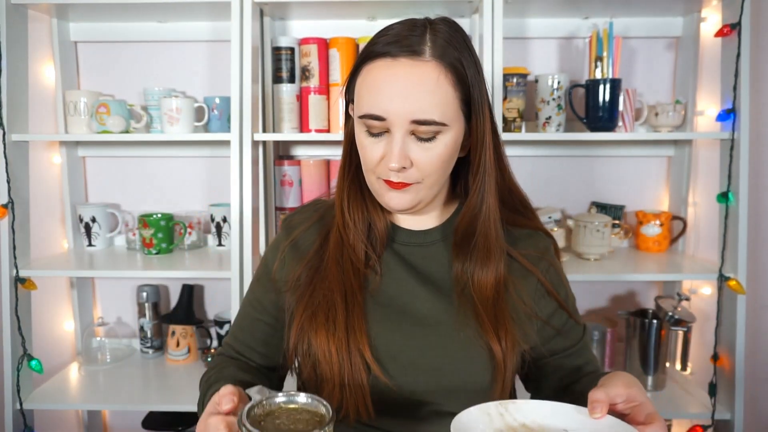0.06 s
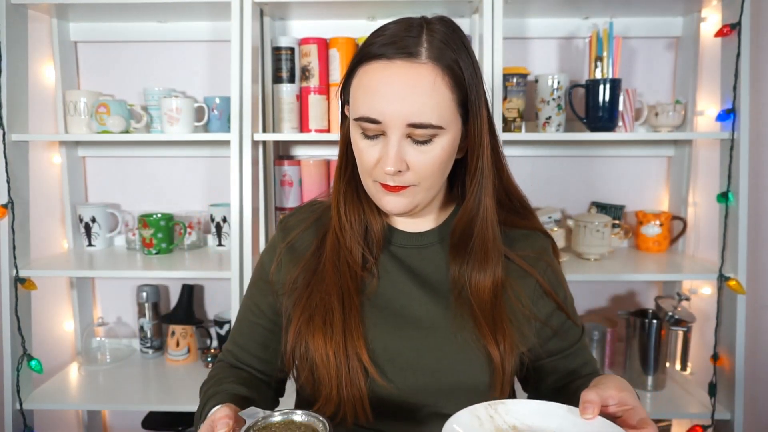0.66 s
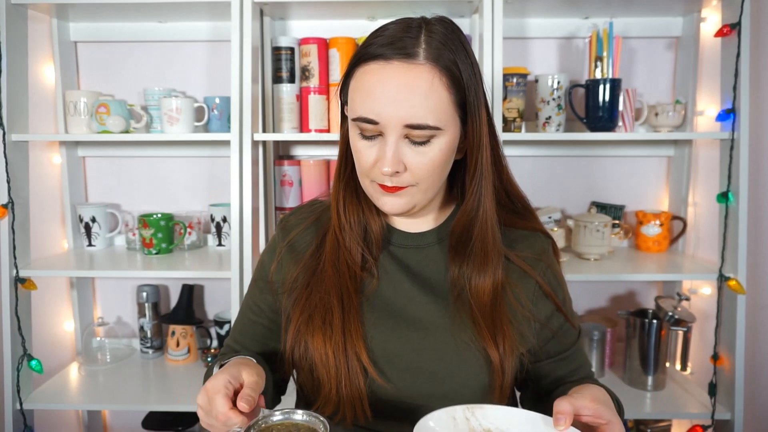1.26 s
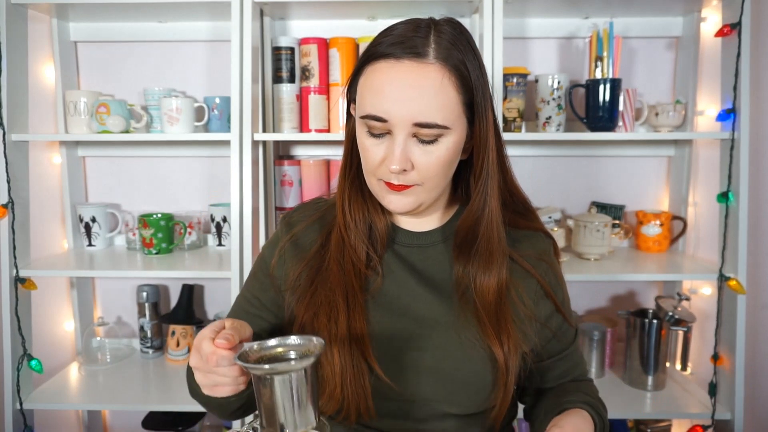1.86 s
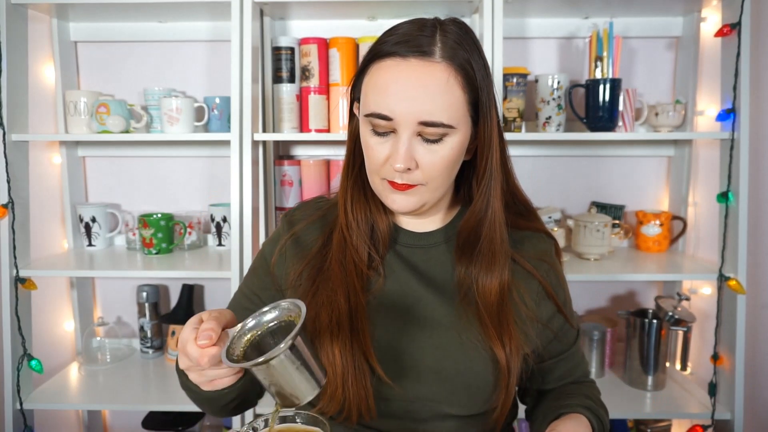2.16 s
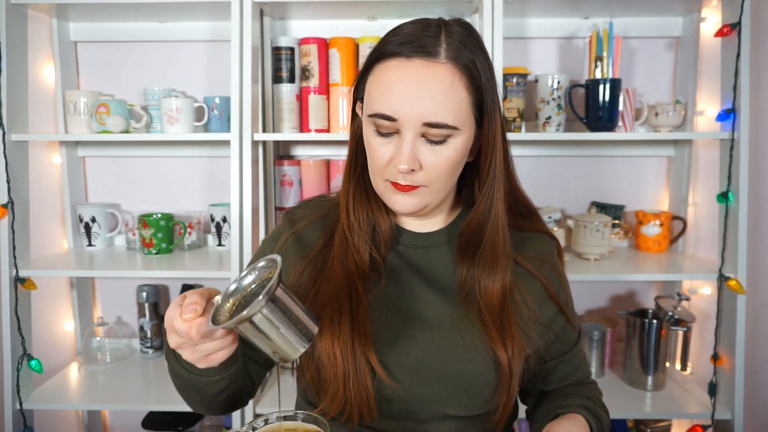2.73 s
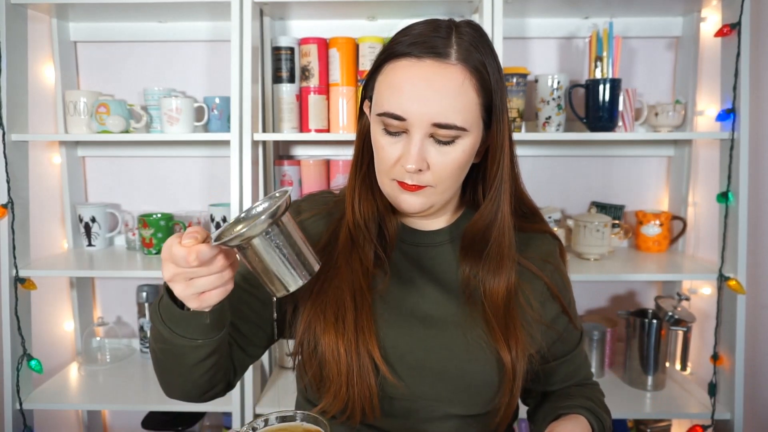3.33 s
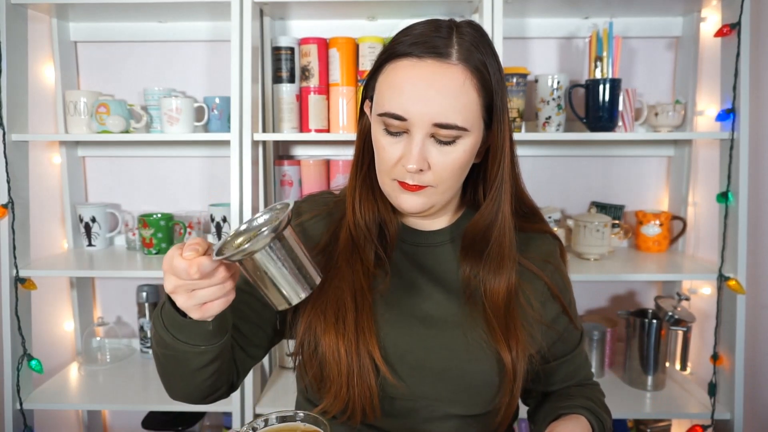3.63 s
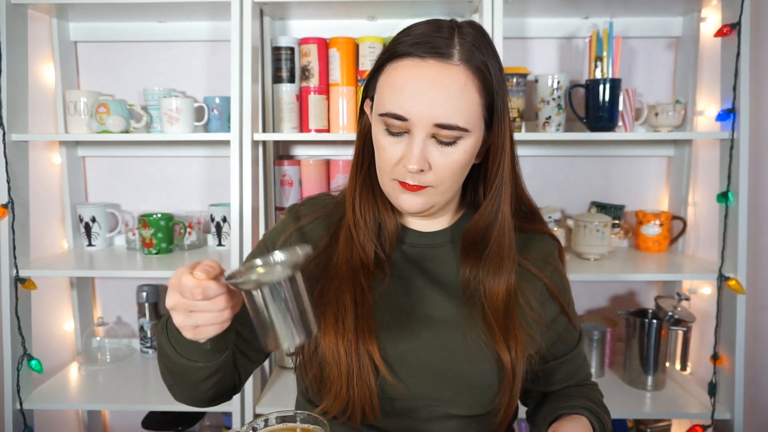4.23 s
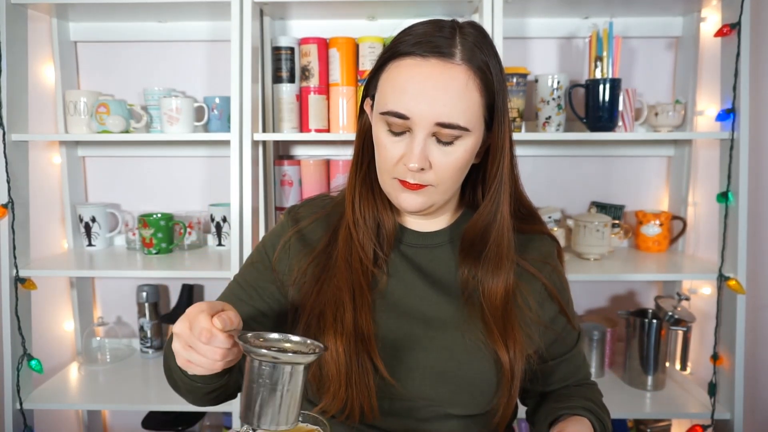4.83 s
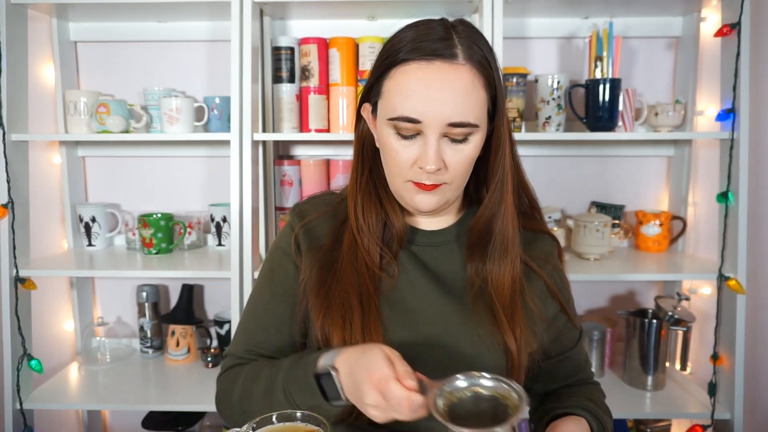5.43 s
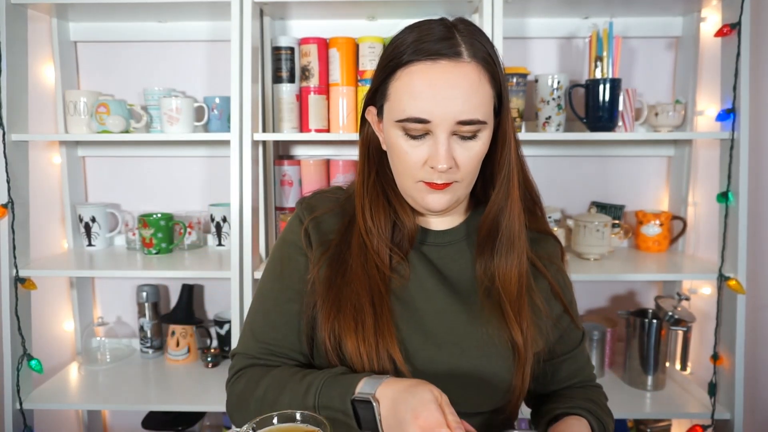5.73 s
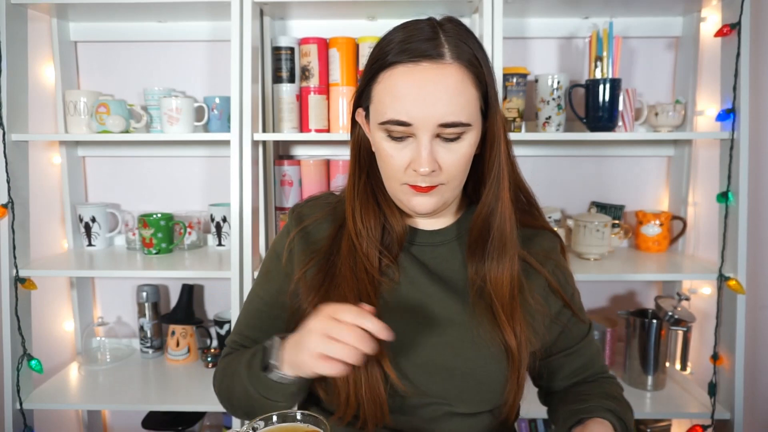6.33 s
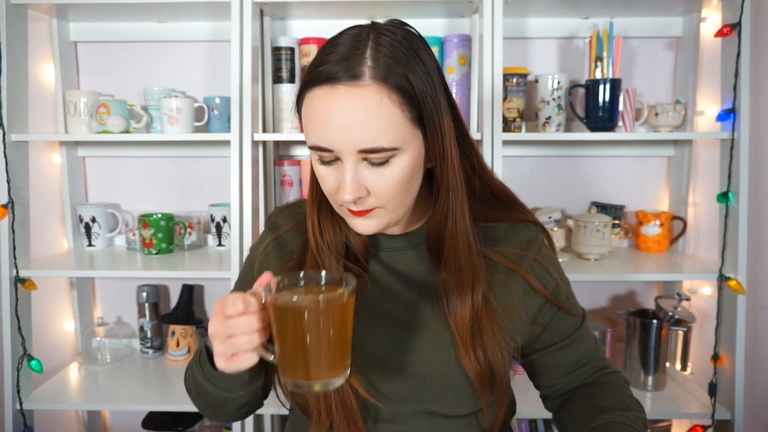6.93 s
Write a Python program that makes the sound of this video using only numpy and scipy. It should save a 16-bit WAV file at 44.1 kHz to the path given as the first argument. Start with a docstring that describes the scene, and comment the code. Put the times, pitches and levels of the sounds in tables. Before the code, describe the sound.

At about 0.4 seconds a glass mug holding a metal infuser lands on a table with a loud, short clack and a low thud. Softer taps and rubs follow until 0.8 seconds, and a small tap with a thin metallic ring comes at 1.4. From about 2.3 seconds the lifted infuser drips into the tea: small, irregular plinks and splashes, thickest around 3 seconds, thinning to single drops that end near 4.3. After a faint rub, the infuser is laid on a plate at about 5.8 seconds with a light cluster of clinks. At 6.5 seconds a hard, bright knock on the table sets off a rattle that stops short a tenth of a second later, leaving a faint dull tail. The sounds are fairly close, in a quiet kitchen with slight reverberation. Soft hiss, a low appliance drone and a barely audible high electrical whine continue throughout.

```python
"""A glass mug holding a metal infuser is put down on a table: the impacts excite the mug's damped
resonances and the modes of the table top, and a quiet kitchen reverberates a little.
The lifted infuser drips into the tea, each drop a splash and a ringing air bubble, and is then laid
on a plate with a light clink. A last hard knock sets off a rattle that stops short.
Soft hiss, a low appliance drone and a thin electrical whine lie under it all."""
import sys
import numpy as np
from scipy import signal
from scipy.fft import rfft, irfft
from scipy.io import wavfile

SR = 44100
rng = np.random.default_rng(int(sys.argv[2]) if len(sys.argv) > 2 else 0)


def wav_record(signal):
    """Record a signal, one row per channel, as 16-bit PCM in the file named by sys.argv[1]."""
    frames = np.transpose(np.atleast_2d(signal))
    bounded = np.clip(frames, -1, 1)
    # unit amplitude maps onto the largest positive 16-bit level
    quanta = np.round(bounded * 32767).astype(np.int16)
    wavfile.write(sys.argv[1], SR, quanta)


N = 307992
T = np.arange(N) / SR

# Levels are relative within each table.
# resonances of the mug with the infuser in it: (frequency [Hz], bandwidth [Hz], level [dB])
MUG_RESONANCES = [(743, 280, -12), (1400, 520, -13), (1990, 350, -0.5), (2495, 190, -0.5),
                  (2956, 280, -2.5), (4060, 200, -8), (5200, 250, -10.5), (6120, 207, -11)]
# contacts of mug and infuser: (time [s], level [dB])
MUG_CONTACTS = [(0.272, -20), (0.3689, 14.5), (0.643, -24), (0.755, -11), (1.3755, -15)]
# modes of the table top: (frequency [Hz], level [dB], t60 [s])
TABLE_MODES = [(87.2, -16, 0.41), (123.7, -7.5, 0.61), (180.8, 2.5, 0.31), (227.4, -5.5, 0.29),
               (272.4, -9.5, 0.31), (330.2, -3.5, 0.264), (392.4, -15, 0.8), (443.6, -5, 0.53),
               (715, -6, 0.44), (801, -7, .4), (930, -11, 0.33), (1132, -6.5, 0.51), (1280, -9.5, 0.5),
               (1460, -17.5, 0.78), (1427, -7.5, 0.66), (1470, -2, 0.67), (1485, -2, 0.9),
               (1740, -13, 0.31), (1950, -0.5, 0.27)]
# blows on the table: (time [s], level [dB], lowest driven [Hz], highest driven [Hz])
TABLE_BLOWS = [(0.3685, -27, 114, 298), (0.428, -32.5, 90, 223), (0.643, -40.5, 90, 308),
               (0.698, -53, 70, 200), (1.376, -55.5, 99, 493), (1.408, -52.5, 100, 398),
               (5.847, -56, 420, 690), (6.5236, -27.5, 350, 2380)]
# onsets of hard contacts: (time [s], level [dB], lowest partial [Hz], loss per partial [dB])
CONTACT_CRACKS = [(0.3695, -10.5, 2133, 15), (0.6432, -39.5, 700, 6), (1.3752, -40.5, 2160, 17),
                  (6.5232, -15, 1260, 6)]
# rattle after the last knock: (frequency [Hz], spectral level [dB])
RATTLE_SPECTRUM = [(100, -35), (230, -7), (430, -8), (600, -14.5), (950, -5.5), (1500, -1.5), (2200, -6),
                   (2600, -17.5), (3400, -17.5), (4600, -33.5), (5500, -27), (7700, -41), (12000, -44),
                   (15000, -53)]
# drops into the tea: (time [s], bubble frequency [Hz], bubble level [dB], glide [octaves/s], splash [dB])
TEA_DROPS = [(2.274, 2900, -48, 1, -65), (2.362, 1990, -42.5, 4, -46.5), (2.5096, 1573, -37.5, -10, -37.5),
             (2.5437, 2550, -33, 11, -33), (2.628, 2090, -43.5, 0, -42), (2.686, 1450, -45.5, -4, -34.5),
             (2.735, 1190, -42, -1, -38.5), (2.798, 2620, -38, 10, -28.5), (2.8465, 1948, -25.5, 12, -36),
             (2.902, 1470, -36, 16.5, -42), (2.9819, 2390, -30, 0.5, -24.5), (3.0364, 1450, -52, 1, -37),
             (3.084, 1900, -37, 28.5, -58), (3.099, 1997, -35, 19, -49), (3.119, 3550, -46, 12, -58),
             (3.14, 1430, -43, -6, -35), (3.176, 3580, -45, 7, -56), (3.183, 1455, -24, 57.5, -24.5),
             (3.387, 2026, -39.5, 8, -57), (3.4519, 1690, -33.5, 3, -38), (3.684, 1430, -47, -8.5, -48),
             (4.0187, 1524, -31.5, -3, -36.5), (4.2863, 1680, -33, -4.5, -39)]
# modes of the plate with the infuser on it: (frequency [Hz], level [dB], t60 [s])
PLATE_MODES = [(1224, -22, 0.12), (1990, 0, 0.13), (3494, 1.5, 0.072), (5840, -10.5, 0.11),
               (7720, -27, .15), (8750, -18.5, 0.2), (10100, -30, 0.16)]
# touches of the infuser on the plate: (time [s], level [dB], highest driven [Hz], pitch [ratio])
PLATE_CONTACTS = [(5.8445, -49.5, 8000, 0.99), (5.848, -44, 9000, 0.97), (5.871, -46, 6030, 1),
                  (5.908, -55, 2500, 0.92), (5.985, -44.5, 1400, 0.935)]
# ringing of the infuser's steel: (time [s], frequency [Hz], level [dB], t60 [s])
STEEL_PINGS = [(1.376, 2170, -58, 0.28), (5.985, 7620, -63.5, 0.3)]
# brushes of the wet mesh: (time [s], level [dB])
MESH_BRUSHES = [(0.533, -57.5), (0.758, -59.5), (2.316, -54.5), (3.379, -64), (5.846, -59)]
# dull thuds and soft rubs on the table: (time [s], level [dB], centre [Hz], swell [s])
TABLE_THUDS_AND_RUBS = [(0.574, -54, 205, 0.044), (0.6425, -48.5, 370, .0026), (0.753, -55, 720, 0.002),
                        (1.335, -55.5, 360, 0.03), (5.28, -61, 520, 0.074), (5.8442, -48, 540, 0.0025),
                        (6.909, -60.5, 447, 0.034)]
# reverberation time of the kitchen: (frequency [Hz], t60 [s])
REVERB_TIMES = [(150, 0.64), (600, 0.81), (1500, 0.65), (2400, 0.61), (6000, 0.69), (14000, 0.19)]
# left-right coherence of sound in the room: (frequency [Hz], coherence [-1..1])
ROOM_COHERENCE = [(130, 0.99), (300, 0.98), (640, 0.82), (1400, 0.61), (3100, 0.15), (6500, -0.41),
                  (15000, 0.33)]
# background noise: (frequency [Hz], spectral level [dB])
BACKGROUND_SPECTRUM = [(15, -51.5), (25, -20), (91, -13.5), (101, -20.5), (122, 1.5), (148, -11),
                       (193, -10), (305, -13.5), (359, -15.5), (389, -15.5), (433, -14), (1200, -21),
                       (1340, -21), (3090, -26.5), (15500, -34)]
# left-right coherence of the background: (frequency [Hz], coherence [-1..1])
BACKGROUND_COHERENCE = [(60, 0.91), (140, 0.96), (290, 0.17), (640, -0.24), (1400, -0.29), (3100, -0.057),
                        (15000, .15)]

LAST_KNOCK_S, RATTLE_STOP_S = 6.5235, 6.6196


def mug():
    """Heavy damping broadens the full mug's resonances, so its impulse response is a short clack."""
    out, impulse = np.zeros(N), signal.unit_impulse(SR // 10) + 1e-18
    clack = sum(from_db(db) * band(impulse, hz - width / 2, hz + width / 2)
                for hz, width, db in MUG_RESONANCES)
    for s, db in MUG_CONTACTS:
        add(out, s, from_db(db) * clack)
    return kitchen(out, wet_db=3, build_s=.001, direct_db=-9, t60_scale=.91)


def table():
    """Modal excitation: soft, heavy blows drive the low modes of the top, hard blows the higher ones."""
    out = np.zeros(N)
    for s, db, low_hz, high_hz in TABLE_BLOWS:
        add(out, s, from_db(db) * ring(TABLE_MODES, low_hz, high_hz))
    return kitchen(out, wet_db=-15, build_s=.006)


def rumble(gain_db=-26, low_hz=32, high_hz=90):
    """Low-frequency coupling: the lower a blow reaches, the more it shakes the whole table."""
    out = np.zeros((2, N))
    for s, db, lowest_hz, _ in TABLE_BLOWS:
        coupling = (np.sqrt(low_hz * high_hz) / lowest_hz) ** .65
        add(out, s, from_db(db + gain_db) * coupling * puff(low_hz, high_hz, swell_s=.03, t60=1.8))
    return out


def cracks(length_s=.0026, partial_spacing=.936):
    """Contact transient: a hard impact begins with a few cycles of inharmonic partials."""
    out, t = np.zeros(N), T[:SR // 50]
    envelope = np.sin(np.pi * np.clip(t / length_s, 0, 1) ** .6)
    for s, db, lowest_hz, loss_db in CONTACT_CRACKS:
        for k in range(8):
            hz = lowest_hz * (1 + k * partial_spacing)
            add(out, s, -from_db(db - k * loss_db) * envelope * np.sin(2 * np.pi * hz * t))
    return kitchen(out, wet_db=-13.5, build_s=.0061) * pan_right(.8)


def snap():
    """A brief contact has a wide spectrum: the hard last knock opens with a bright snap."""
    out = np.zeros((2, N))
    add(out, LAST_KNOCK_S, from_db(-27) * puff(2200, 6000, swell_s=.0001, t60=.0051))
    return out


def rattle():
    """Dense collisions merge into noise: things on the table chatter, with a thin metallic zing."""
    out, t = np.zeros((2, N)), T[:SR]
    zing = from_db(-46) * unit_rms(band(noise(ROOM_COHERENCE), 6650, 6950, order=1)) * fade(t, t60=.56)
    chatter = from_db(-26) * noise(ROOM_COHERENCE, RATTLE_SPECTRUM) * fade(t, t60=5.2)
    add(out, LAST_KNOCK_S, chatter + zing)
    return out * pan_right(.8)


def drips(crater_hz=1420, crater_delay_s=.00395, splash_lead_s=.0004):
    """Air entrainment: each drop splashes and traps a bubble; its crater closes on a second, low one."""
    bubbles, splashes, t = np.zeros(N), np.zeros(N), T[:SR // 5]
    for s, hz, db, glide, splash_db in TEA_DROPS:
        add(bubbles, s, from_db(db) * bubble(hz, glide))
        crater = bubble(crater_hz * np.exp(.052 * rng.standard_normal()))
        add(bubbles, s + crater_delay_s, from_db(splash_db - 11) * crater)
        slap = 8 * signal.unit_impulse(len(t))
        spatter = rng.standard_normal(len(t)) * fade(t, t60=.027)
        splash = band(slap + spatter, 1450, 3300, order=4)
        add(splashes, s - splash_lead_s, from_db(splash_db) * splash / np.abs(splash).max())
    bubbles = kitchen(bubbles, wet_db=-8, build_s=.005, t60_scale=.83)
    splashes = kitchen(splashes, wet_db=-1.5, build_s=.00067, t60_scale=.78)
    return (bubbles + from_db(-5) * splashes) * pan_right(.4)


def bubble(hz, glide=0, pinch_s=.0007, glide_s=.012, onset_s=.0004, t60_cycles=71.4):
    """Bubble resonance: the pitch is high at pinch-off, settles and glides; small bubbles die sooner."""
    t = T[:SR // 5]
    pinch_off = 1 + .3 * np.exp(-t / pinch_s)
    pitch = hz * pinch_off * 2 ** (glide * np.minimum(t, glide_s))
    envelope = fade(t, t60_cycles / hz) * (1 - np.exp(-t / onset_s))
    return envelope * np.sin(2 * np.pi * np.cumsum(pitch) / SR)


def drain(start_s=2.5, swell_s=.051, fall_db_per_s=9.5, specks_per_s=500,
          droplets_per_s=10, droplets_for_s=.7, droplet_hz=3470):
    """Drainage decays exponentially: the lifted mesh sheds a fine spray and, at first, tiny droplets."""
    age = np.maximum(T - start_s, 0)
    flow = np.minimum(age / swell_s, 1) * from_db(-fall_db_per_s * age)
    specks = rng.standard_normal((2, N)) * (rng.random(N) < specks_per_s / SR)
    spray = from_db(-64) * flow * unit_rms(band(specks, 4000, 13800))
    droplets = np.zeros(N)
    for k, (jitter, detune, strength) in enumerate(rng.uniform(-1, 1, size=(16, 3))):
        delay_s = (k + 1 + jitter / 2) / droplets_per_s
        if delay_s < droplets_for_s:
            droplet = bubble(droplet_hz * (1 + .05 * detune), glide=12)
            add(droplets, start_s + delay_s, from_db(-49.5 + 2 * strength) * droplet)
    return spray + kitchen(droplets, wet_db=-5, build_s=.003)


def plate(tick_low_hz=900, tick_high_hz=4200):
    """Loading shifts the plate's modes: each touch of the infuser ticks and clinks at its own pitch."""
    out = np.zeros(N)
    for s, db, high_hz, pitch in PLATE_CONTACTS:
        hardness = min(high_hz / tick_high_hz, 1)
        tick = unit_rms(band(rng.standard_normal(SR), tick_low_hz, tick_high_hz)) * fade(T[:SR], t60=.12)
        clink = ring(PLATE_MODES, high_hz=high_hz, pitch=pitch)
        add(out, s, from_db(db) * (clink + from_db(-12) * hardness * tick))
    return kitchen(out, wet_db=-3.5, build_s=.0042) * pan_right(.7)


def pings():
    """Free vibration: once released, the infuser's steel rings on in a single thin tone."""
    out = np.zeros(N)
    for s, hz, db, t60 in STEEL_PINGS:
        add(out, s, ring([(hz, db, t60)]))
    return kitchen(out, wet_db=2, build_s=.0033)


def handling(edge_ratio=1.46):
    """Friction and impact noise: bright brushes of the mesh, dull thuds and soft rubs on the table."""
    out = np.zeros((2, N))
    for s, db in MESH_BRUSHES:
        add(out, s, from_db(db) * puff(5500, 14500, swell_s=.005, t60=.28))
    for s, db, hz, swell_s in TABLE_THUDS_AND_RUBS:
        contact = puff(hz / edge_ratio, hz * edge_ratio, swell_s, t60=.25 + 8.5 * swell_s)
        add(out, s, from_db(db) * contact)
    return out


def rattle_tail():
    """Reverberation outlasts its source: a faint dull tail remains when the rattle stops."""
    out = np.zeros((2, N))
    add(out, RATTLE_STOP_S, from_db(-51) * puff(350, 895, swell_s=.0024, t60=.5))
    return out


def kitchen(x, wet_db, build_s, direct_db=0, t60_scale=1):
    """Reverberation: a diffuse field builds up behind the direct sound and decays band by band."""
    t, hz = T[:SR], np.fft.rfftfreq(SR, 1 / SR)
    diffuse, tail = rfft(noise(ROOM_COHERENCE)), 0
    for centre, t60 in REVERB_TIMES:
        band_weight = at_hz([(f, f == centre) for f, _ in REVERB_TIMES], hz)
        tail = tail + irfft(diffuse * band_weight, SR) * fade(t, t60 * t60_scale)
    build_up = 1 - np.exp(-(t / build_s) ** 2)
    response = unit_rms(tail * build_up) / np.sqrt(SR)   # unit energy
    reverb = signal.fftconvolve(x[None], response, axes=1)[:, :N]
    return from_db(direct_db) * x + from_db(wet_db) * reverb


def room_tone(whine_hz=15668):
    """Steady background: soft hiss, an appliance driving a room resonance, and an electrical whine."""
    drone = unit_rms(band(noise(BACKGROUND_COHERENCE, size=N), 113.7, 133.4, order=1))
    hiss = noise(BACKGROUND_COHERENCE, BACKGROUND_SPECTRUM, size=N)
    whine = np.sin(2 * np.pi * whine_hz * T)
    return from_db(-57) * hiss + from_db(-64) * drone + from_db(-75) * whine


def ring(modes, low_hz=1, high_hz=SR, pitch=1):
    """Modal superposition: a struck body sums damped sines, driven mainly between the two corners."""
    t, out = T[:SR], np.zeros(SR)
    for k, (hz, db, t60) in enumerate(modes):
        drive = 1 / np.sqrt((1 + (low_hz / hz) ** 4) * (1 + (hz / high_hz) ** 4))
        out += (-1) ** k * drive * from_db(db) * fade(t, t60) * np.sin(2 * np.pi * hz * pitch * t)
    return out


def puff(low_hz, high_hz, swell_s, t60):
    """Band-limited stereo noise with a linear rise and an exponential decay."""
    t = T[:SR]
    envelope = np.minimum(t / swell_s, 1) * fade(np.maximum(t - swell_s, 0), t60)
    return envelope * unit_rms(band(noise(ROOM_COHERENCE), low_hz, high_hz))


def noise(coherence, spectrum=None, size=SR):
    """Partial coherence: independent mid and side noises mix to a stereo pair of unit rms."""
    hz = np.fft.rfftfreq(size, 1 / SR)
    mid, side = rfft(rng.standard_normal((2, size)))
    alike = at_hz(coherence, hz)
    pair = np.sqrt(1 + alike) * mid + np.sqrt(1 - alike) * side * np.array([[1], [-1]])
    colour = from_db(at_hz(spectrum, hz)) if spectrum else 1
    return unit_rms(irfft(pair * colour, size))


def band(x, low_hz, high_hz, order=2):
    """Causal band-pass filter."""
    return signal.sosfilt(signal.butter(order, [low_hz, high_hz], "band", fs=SR, output="sos"), x)


def fade(t, t60):
    """Exponential decay by 60 dB in t60 seconds."""
    return np.exp(-np.log(1000) * t / t60)


def at_hz(points, hz):
    """Interpolation on a log-frequency axis."""
    f, value = np.transpose(points)
    return np.interp(np.log(hz + 1e-9), np.log(f), value)


def pan_right(db):
    """Level panning: the left channel falls and the right rises by db."""
    return from_db([[-db], [db]])


def from_db(db):
    """Decibels to amplitude ratio."""
    return 10 ** (np.asarray(db) / 20)


def unit_rms(x):
    """Normalisation to unit rms."""
    return x / np.sqrt(np.mean(x ** 2) + 1e-20)


def add(track, s, sound):
    """Superposition of a sound on a track from time s on."""
    start = round(s * SR)
    part = sound[..., :N - start]
    track[..., start:start + part.shape[-1]] += part


def scene():
    """All sources superpose; the ringing of the last knock is cut off within a millisecond."""
    gate = np.clip((RATTLE_STOP_S - T) / .001, 0, 1)
    knocks = (table() + cracks() + snap() + rattle()) * gate
    return (knocks + rumble() + rattle_tail() + mug() + plate() + pings()
            + drips() + drain() + handling() + room_tone())


def record(dry, cutoff_hz=15900):
    """Band limiting: a steep low-pass filter removes the highest treble."""
    return signal.sosfilt(signal.ellip(12, .1, 80, cutoff_hz, fs=SR, output="sos"), dry)


dry = scene()
out = record(dry)
wav_record(out)
```